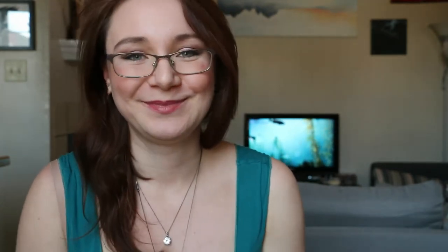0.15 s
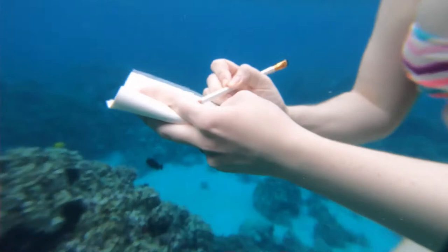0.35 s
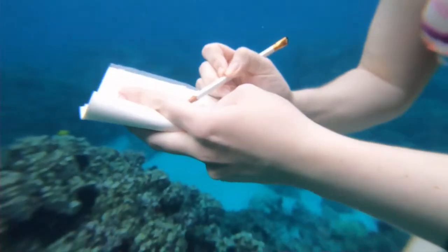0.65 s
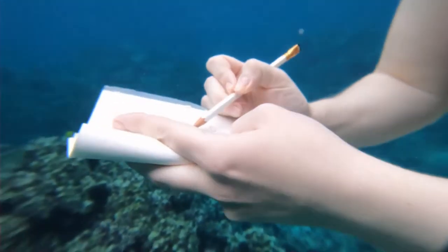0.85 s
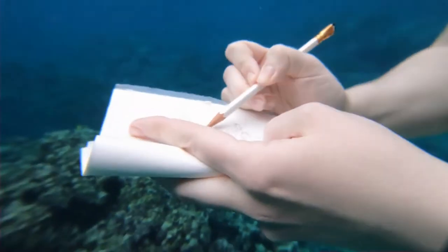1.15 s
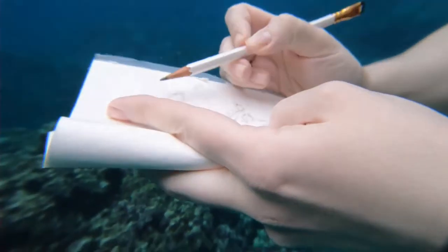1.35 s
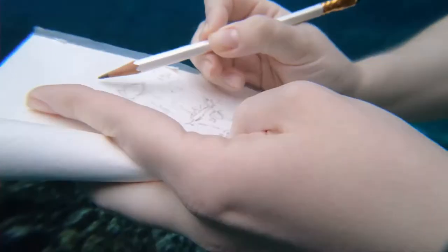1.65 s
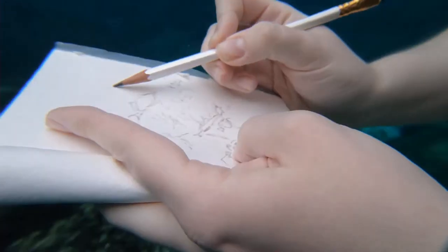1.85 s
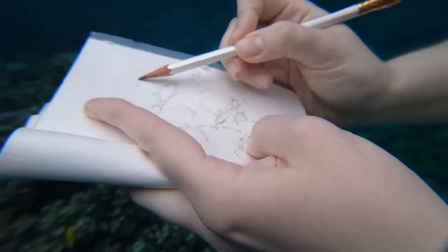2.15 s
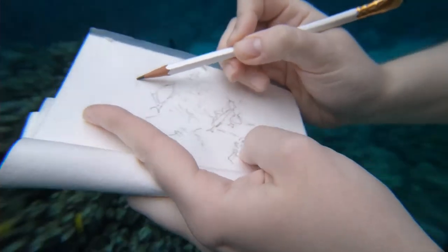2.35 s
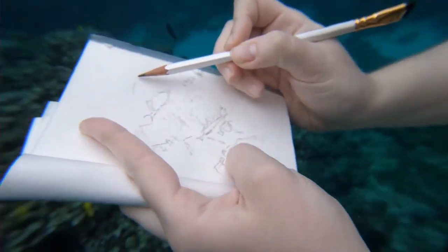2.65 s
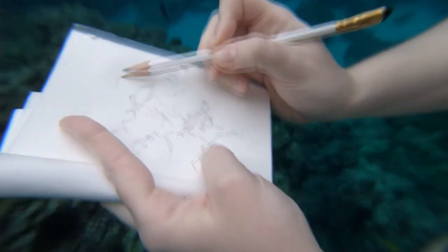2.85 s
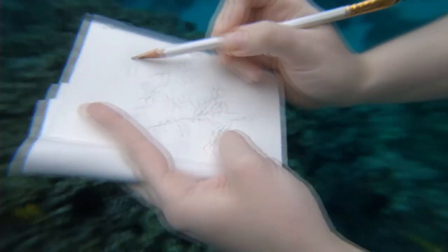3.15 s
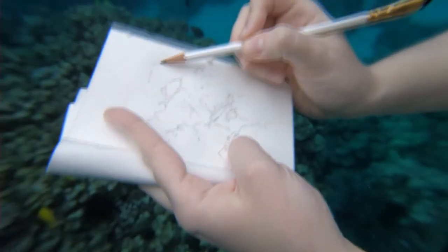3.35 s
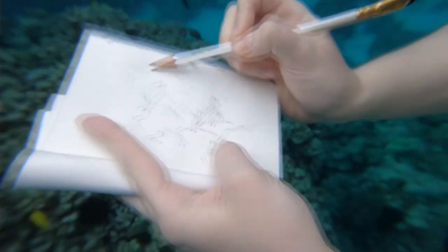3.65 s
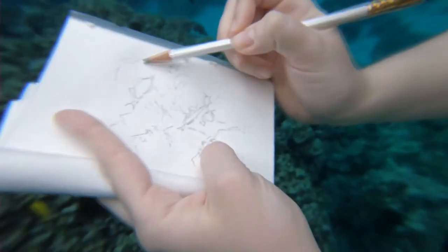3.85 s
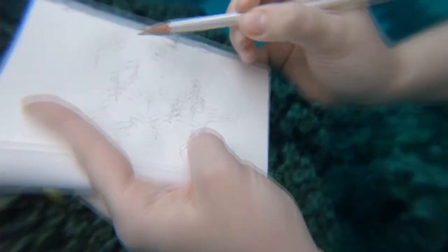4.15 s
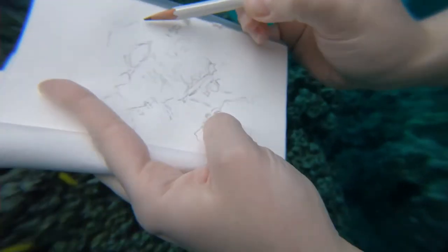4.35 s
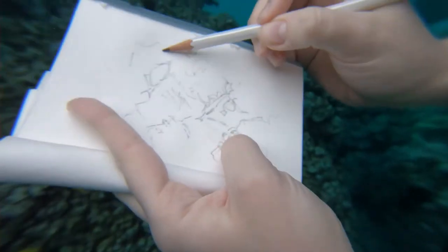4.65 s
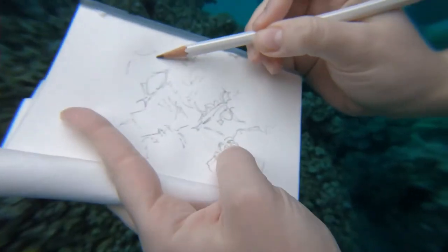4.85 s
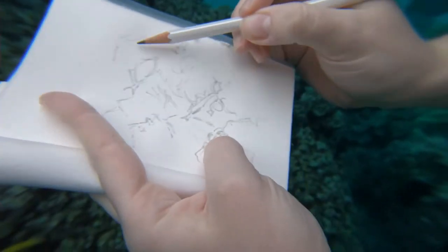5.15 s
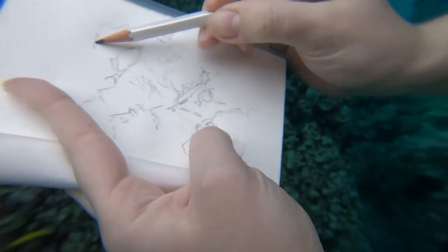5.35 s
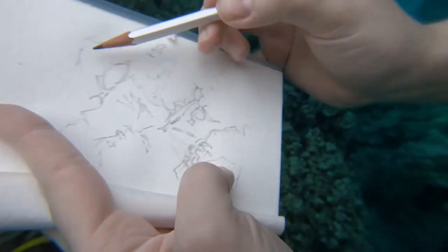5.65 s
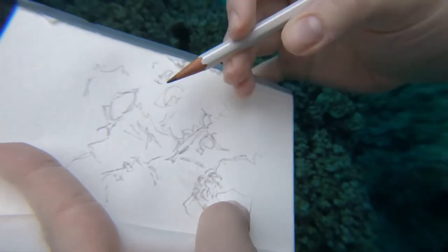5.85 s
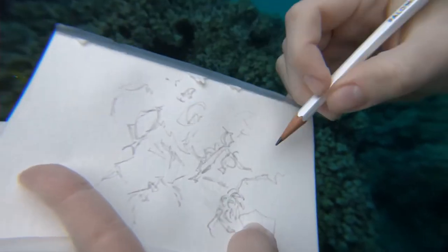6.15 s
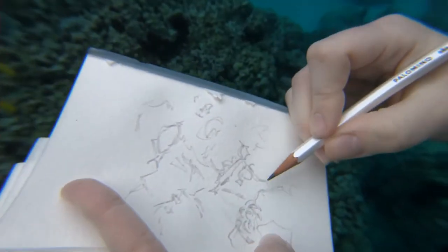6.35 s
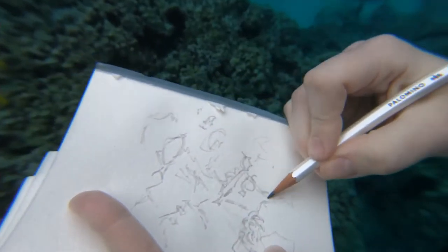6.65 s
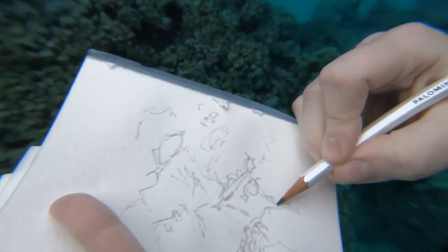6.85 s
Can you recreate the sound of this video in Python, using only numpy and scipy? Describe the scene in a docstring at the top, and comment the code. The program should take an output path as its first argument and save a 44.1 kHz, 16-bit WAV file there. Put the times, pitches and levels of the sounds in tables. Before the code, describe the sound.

A quiet living room is cut off, and close, boxy underwater sound takes over. Low surges and gurgles roll around the camera housing while fingers knock and drag on it, busiest in the first two and a half seconds. Crackling shrimp grow denser and wider around the listener. Short pencil scrapes and small bubbles follow, then a burst of deep shoves, a tiny gap and the first underwater bumps again.

```python
"""Living room, then coral reef: still room air and a faint hum stop short, and a camera housing is under water.
Shrimp snap near and far: shock fronts and noise bursts ringing wall resonances. Surges shape resonant
buffeting and gurgle, hissing wash and ringing froth. Hands bump (damped sines) and rub (grainy noise) the case,
a pencil scratches a pad, bubbles ring, and pressure swings shove the camera.
After the heavy shoves the underwater sound breaks off and its opening plays again."""
import sys
import numpy as np
from scipy import signal
from scipy.fft import rfft, irfft, next_fast_len
from scipy.io import wavfile

SR = 44100
rng = np.random.default_rng(int(sys.argv[2]) if len(sys.argv) > 2 else 0)


def store_pcm(level_fs):
    """Save levels as 16-bit WAV."""
    pcm = np.round(np.clip(level_fs, -1, 1) * 32767).astype(np.int16)
    wavfile.write(sys.argv[1], SR, np.atleast_2d(pcm).T)


N = 308853
TIME = np.arange(N) / SR
ROOM_END_S, DIVE_START_S, DIVE_END_S, RESTART_S = .210, .275, 6.484, 6.515
PORT_LAG_MS = .45   # lag range (+/-) between the two ports for randomly placed snaps


def from_db(db):
    """Decibels to gain."""
    return 10 ** (np.asarray(db) / 20)


def rms_one(x):
    """Scale to unit power."""
    return x / np.sqrt(np.mean(x ** 2) + 1e-20)


def pan(db):
    """Left and right gains for a left-minus-right level difference."""
    return from_db(np.array([[db], [-db]]) / 2)


def narrow(x, side_db):
    """Scale the difference between the ears."""
    mid = x.mean(axis=0)
    return mid + (x - mid) * from_db(side_db)


def add(out, s, sound):
    """Mix a stereo sound in at a time."""
    i = round(s * SR)
    out[:, i:i + sound.shape[1]] += sound[:, :N - i]


def in_time(curve):
    """A control curve at every sample."""
    return np.interp(TIME, *np.transpose(curve))


def drift(rate_hz):
    """Random control curve of rms 1: straight lines between random points."""
    points = rng.standard_normal(4096)
    return rms_one(np.interp(TIME * rate_hz, np.arange(len(points)), points))


def fade_between(start_s, end_s):
    """Gain of 1 between two times, with 2 ms fades."""
    edge_distance_s = np.minimum(TIME - start_s, end_s - TIME)
    return np.clip(edge_distance_s / .002, 0, 1)


def strokes(rows):
    """The strength of a row of short strokes over time."""
    return sum(from_db(db) * np.exp(-((TIME - s) / half_s) ** 2 / 2) for s, db, half_s in rows)


def pair(alike):
    """White noise at two ports with a given correlation."""
    mid, side = rng.standard_normal((2, N))
    alike = np.clip(alike, -1, 1)
    return np.sqrt(1 + alike) * mid + np.sqrt(1 - alike) * side * [[1], [-1]]


def colour(x, spectrum):
    """Shape a steady noise to a spectrum; rms 1."""
    size = next_fast_len(N)
    hz, db = np.transpose(spectrum)
    bins_hz = np.maximum(np.arange(size // 2 + 1) * SR / size, 1)
    gain = from_db(np.interp(np.log(bins_hz), np.log(hz), db))
    return rms_one(irfft(rfft(x, size) * gain, size)[:, :N])


def low_pass(x, hz, order=2):
    """Butterworth low-pass."""
    return signal.sosfilt(signal.butter(order, min(hz, .45 * SR), fs=SR, output="sos"), x)


def resonate(x, modes):
    """Parallel resonances with steep skirts."""
    out = 0
    for hz, width_hz, db in modes:
        edges_hz = [max(hz - width_hz * .7, 10), hz + width_hz * .7]
        band = signal.butter(2, edges_hz, "band", fs=SR, output="sos")
        out = out + from_db(db) * signal.sosfilt(band, x + 1e-18)
    return out


def arrive(x, lag_ms):
    """A sound reaches one port before the other; positive lag delays the left."""
    n, lag = np.arange(len(x)), round(lag_ms * SR / 1000)
    return np.array([np.interp(n - max(d, 0), n, x, left=0) for d in (lag, -lag)])


SNAP_CUT_HZ = 9580


def muffle(x, leak_db=-26):
    """The housing wall passes little of the top octave."""
    return low_pass(x, SNAP_CUT_HZ, order=8) + from_db(leak_db) * x


FLEX_HZ, FLEX_RADIANS = 250, 1.96


def flex(x):
    """Touches bend the wall: the right port lags the left in phase, except in the bass."""
    size = next_fast_len(x.shape[1] + 2048)
    steep = (np.arange(size // 2 + 1) * SR / size / FLEX_HZ) ** 8
    turn = np.exp(-1j * FLEX_RADIANS * steep / (1 + steep))
    right = irfft(rfft(x[1], size) * turn, size)[:x.shape[1]]
    return np.array([x[0], right])


# air spectrum: f/Hz, relative level/dB
ROOM_AIR = [(18, -70), (30, -5), (98, 0), (252, -10), (295, -7), (374, -7.5), (426, -14.5), (616, -15.5),
            (1250, -15), (2900, -26.5), (6550, -33), (9970, -34.5), (16000, -41)]
# appliance hum partials: f/Hz, level/dB
ROOM_HUM = [(291, -52.5), (438, -61)]


def living_room(air_db=-45, hiss_db=-67):
    """Still indoor air with a faint appliance hum, nearly the same in both ears, under a thin wide hiss."""
    hum = sum(from_db(db) * np.sqrt(2) * np.sin(2 * np.pi * hz * TIME) for hz, db in ROOM_HUM)
    air = colour(pair(.99), ROOM_AIR)
    return from_db(air_db) * air + hum + from_db(hiss_db) * rms_one(pair(0))


# far sizzle as the camera drifts over the reef: t/s, relative level/dB
COLONY = [(0.28, -74), (0.68, -67.5), (2.63, -61), (2.82, -65), (3.23, -59.5), (4.03, -61), (4.48, -59),
          (4.72, -64.5), (6.27, -58.5), (6.48, -58.5)]
# wall resonances under a snap, knock and crack: f/Hz, nominal width/Hz, relative level/dB
SNAP_LOW_MODES = [(1786, 246, -9), (2837, 457, 3), (4020, 590, -1.5)]
SNAP_HIGH_MODES = [(5110, 240, 0.77), (5730, 233, 3.3), (6460, 734, -1.4), (6967, 1045, -4)]


def far_shrimp(per_s=280, spread_db=6.5, low_db=-8, blur_db=-9, gain_db=6, waver_db=3.5):
    """The rest of the colony: countless weak snaps from all bearings, blurred into a sizzle."""
    clicks, rattle_t = np.zeros((2, N)), TIME[:40]
    chances = rng.random((4096, 3))
    rattles = rng.standard_normal((len(chances), len(rattle_t))) * (1 - rattle_t / rattle_t[-1])
    for (when, nearness, bearing), rattle in zip(chances[:int(per_s * N / SR)], rattles):
        size = from_db(spread_db * min(-np.log(nearness), 3))
        add(clicks, when * TIME[-1], size * arrive(rattle, lag_ms=PORT_LAG_MS * (2 * bearing - 1)))
    sizzle = rms_one(clicks) + from_db(blur_db) * pair(0)
    high = rms_one(resonate(sizzle, SNAP_HIGH_MODES))
    low = rms_one(resonate(sizzle, SNAP_LOW_MODES))
    level = from_db(in_time(COLONY) + gain_db + waver_db * drift(35))
    return level * muffle(high + from_db(low_db) * low)


# water surges: crest t/s, build-up/s, release/s, buffeting level/dB, gurgle level/dB, wash level/dB
SURGES = [(.35, 0.06, 0.14, -44, -48, -63.5), (.57, 0.034, 0.034, -37.5, -67, -63),
          (0.732, 0.095, 0.022, -74, -47, -51), (.97, 0.033, 0.17, -46, -59.5, -64.5),
          (1.42, 0.18, 0.2, -56.5, -56, -60.5), (1.76, 0.15, 0.091, -49, -61, -82),
          (1.96, 0.054, 0.11, -51.5, -58, -73), (2.2, 0.064, 0.084, -48, -56, -64),
          (2.62, .14, 0.097, -42, -49, -61.5), (3.15, 0.074, 0.15, -52.5, -55.5, -64.5),
          (3.48, 0.082, 0.021, -52, -57, -75), (3.99, 0.2, 0.17, -39.5, -46.5, -67),
          (4.42, 0.12, 0.11, -49.5, -60, -71), (4.65, 0.021, 0.037, -49.5, -56, -57.5),
          (5.36, 0.33, 0.066, -46, -57, -67), (6.02, 0.22, 0.21, -42, -54.5, -67),
          (6.39, 0.072, 0.21, -37, -46, -57.5)]
# between surges: buffeting level/dB, gurgle level/dB, wash level/dB
CALM_DB = (-61.5, -69.5, -69)


def surges():
    """Strength of buffeting, gurgle and wash over time: each surge builds to a crest and lets go."""
    power = from_db(CALM_DB)[:, None] ** 2 + np.zeros(N)
    for s, build_s, release_s, *levels_db in SURGES:
        width_s = np.where(TIME < s, build_s, release_s)
        swell = np.exp(-np.minimum(((TIME - s) / width_s) ** 2, 20))
        power += from_db(levels_db)[:, None] ** 2 * swell
    return np.sqrt(power)


# housing and cavity resonances: f/Hz, nominal width/Hz, relative level/dB
BUFFET_MODES = [(58.6, 13.8, 10), (149, 57.5, -6), (165.8, 49.3, 4.5), (200, 11.7, -2), (384, 165, -28.5)]
GURGLE_MODES = [(462, 69, 2), (666.4, 89, 7), (792.5, 18.3, 5)]
# cavity tuning: t/s, pitch ratio
GURGLE_PITCH = [(.3, 0.86), (.55, 0.89), (.72, 1.005), (4.9, 1.02), (6.4, 0.98)]
# slow rocking spectrum: f/Hz, relative level/dB
SWAY = [(10, -17), (28, 2), (45, -12), (90, -71), (300, -49.5)]
SWAY_DB, SWAY_FOLLOWS = -64.5, 0.25   # base level; exponent on the buffeting


def flow(buffeting, gurgling):
    """Eddies shake the housing's low modes, rock the camera and gurgle in cavities."""
    eddies, rocking = drift(14), drift(6)
    buffet = rms_one(resonate(pair(0.59), BUFFET_MODES)) * buffeting * from_db(1.23 * eddies)
    sway_level = rms_one(buffeting) ** SWAY_FOLLOWS * from_db(SWAY_DB + 4.3 * rocking)
    sway = colour(pair(0.6), SWAY) * sway_level
    read = np.cumsum(in_time(GURGLE_PITCH)) % N   # varying read speed shifts the pitch
    cavity = [np.interp(read, np.arange(N), port) for port in resonate(pair(0.12), GURGLE_MODES)]
    gurgle = rms_one(np.array(cavity)) * gurgling * from_db(3.04 * drift(40))
    return (buffet + sway + gurgle) * pan(db=-1.5)


def froth(per_s=450, spread_db=6, cycles=5):
    """Tiny bubbles burst along the case at random, each ringing for a few cycles."""
    out, t = 0, TIME[:512]
    for hz in np.geomspace(1000, 3200, num=12):
        born = (rng.random(N) < per_s / 12 / SR) * rng.choice([-1, 1], N)
        size = from_db(spread_db * np.minimum(rng.exponential(1, N), 3))
        ring = np.sin(2 * np.pi * hz * t) * np.exp(-3 * hz * t / cycles)
        out = out + arrive(signal.oaconvolve(born * size, ring)[:N], lag_ms=0.38)
    return rms_one(out)


# wash spectrum: f/Hz, relative level/dB
WASH = [(250, 10.5), (700, 4), (1150, 1), (1700, 6), (2100, -8.5), (2800, 6.5), (4300, -0.5), (7000, -14),
        (10000, -13), (13000, -35), (16000, -58)]


def wash(strength, hiss_db=2.0, froth_db=1.3):
    """Water hisses and froths over the camera's face."""
    flutter = from_db(1.5 * drift(90))
    hiss = colour(pair(0), WASH) * flutter
    return strength * (from_db(hiss_db) * hiss + from_db(froth_db) * froth())


# single bubbles: t/s, relative level/dB, starting f/Hz, t60/s
BUBBLES = [(3.69, -26.5, 1365, 0.024), (4.414, -49, 753, 0.086), (5.438, -34.5, 1353, 0.016),
           (6.226, -30, 823, 0.015)]
BUBBLE_WOBBLE = .3


def bubbles(phase_rise_per_s=1.8, pinch_s=0.0058):
    """A bubble pinches off and rings, rising a little in pitch as its shape wobbles."""
    out, t = np.zeros((2, N)), TIME[:4096]
    for s, db, hz, t60_s in BUBBLES:
        ring = np.sin(2 * np.pi * hz * t * (1 + phase_rise_per_s * t)) * (1 - np.exp(-t / pinch_s))
        wobble = rms_one(low_pass(rng.standard_normal(len(t)), hz=180))
        ring = ring * (1 + BUBBLE_WOBBLE * wobble)
        add(out, s, arrive(ring * from_db(db + 10 - 60 * t / t60_s), lag_ms=0.26))
    return out


# pencil strokes on the pad: middle t/s, level/dB, half length/s
SCRATCHES = [(2.180, -59.5, 0.028), (3.691, -48, 0.0062), (4.428, -49.5, 0.0085), (4.650, -50, 0.0072),
             (5.995, -55.5, 0.0077), (6.050, -48, 0.027), (6.110, -47, 0.013), (6.165, -45.5, 0.0084)]
# pad resonances: f/Hz, nominal width/Hz, relative level/dB
PENCIL_MODES = [(1395, 110, 3), (1920, 500, -1.5), (2470, 580, 5)]


def pencil(grain_db=6):
    """The lead catches on the tooth of the paper and rattles the pad."""
    grains = pair(0.49) * from_db(grain_db * drift(300))
    return strokes(SCRATCHES) * rms_one(resonate(grains, PENCIL_MODES))


# skin dragging on the case: middle t/s, level/dB, half length/s
RUBS = [(.585, -48.5, 0.035), (0.922, -40, 0.012), (1.341, -32, 0.0025), (1.369, -49, .003),
        (1.400, -53, 0.074), (1.709, -42, 0.022), (1.748, -31.5, 0.0067), (1.780, -31, 0.0096),
        (1.818, -42, 0.021), (2.367, -32, 0.0048), (2.41, -49, 0.035), (4.420, -50, 0.0063),
        (6.248, -41.5, 0.0065)]
# rub spectrum: f/Hz, relative level/dB
RUB = [(25, -22), (70, 8), (180, 1.5), (450, 3.5), (700, -9), (1100, -4), (1700, -11), (3200, -15.5),
       (4500, -26.5), (12000, -49)]


def rubs(grain_db=4):
    """Skin sticks and slips in uneven grains under each short stroke."""
    grains = pair(0.53) * from_db(grain_db * drift(400))
    return strokes(RUBS) * flex(colour(grains, RUB)) * pan(db=-3.5)


# bumps on the housing: t/s, thud level/dB, f/Hz, swell/s, hard contact level/dB
BUMPS = [(0.345, -31, 152, 0.0012, -54), (0.55, -27.5, 87, .0054, -42), (0.577, -24, 67, 0.0093, -39),
         (.917, -33, 250.7, 0.0024, -18), (.924, -22.5, 150, 0.0039, -50), (.937, -27, 182, .0038, -43),
         (1.003, -21, 130, 0.0025, -30.5), (1.22, -27.5, 177, 0.0041, -34.5),
         (1.238, -35.5, 167, 0.0035, -46), (1.34, -23, 170, 0.007, -44), (1.4, -39, 158, 0.0086, -56),
         (1.735, -33, 160, 0.019, -59), (1.768, -36.5, 167, 0.014, -56), (1.845, -38.5, 186, 0.0069, -43),
         (2.369, -28.5, 157, 0.0093, -37), (2.392, -29, 158, 0.009, -43), (2.487, -35, 143, 0.0054, -39),
         (2.554, -18.5, 87.5, 0.0023, -39.5), (2.57, -34.5, 193.6, 0.0048, -53),
         (3.138, -44.5, 188, 0.0099, -37), (3.471, -40.5, 151.9, 0.0047, -53),
         (3.958, -31, 125.2, 0.012, -42), (4.013, -32, 122, 0.023, -51), (4.112, -27, 183, 0.0035, -81),
         (4.392, -37.5, 158, 0.0025, -51), (4.755, -42, 125, 0.0065, -53), (5.257, -36, 127, 0.012, -49),
         (5.992, -32.5, 131, 0.013, -46)]
# hard contact resonances: f/Hz, nominal width/Hz, relative level/dB
CONTACT_MODES = [(386, 135, -5.5), (550, 196, -1.5), (1110, 370, -22.5)]
# deep thuds move the whole case; higher ones lean to the right
WHOLE_CASE_HZ, BUMP_PAN_DB_PER_OCTAVE = 112, -16.5


def bumps(contact_s=0.0047, contact_gain_db=2, thud_lag_ms=0.1, sag=0.048, body_db=-11, body_s=0.022):
    """A hard tick of contact, a thud that the water damps within a few cycles, and a shudder of the case."""
    out, t = np.zeros((2, N)), TIME[:8192]
    for s, db, hz, swell_s, contact_db in BUMPS:
        age = t / max(swell_s, .001)
        pitch_hz = hz * (1 + sag * (np.exp(-age / 2) - .5))   # the wall slackens as the push lets go
        push = age * np.exp(1 - age)
        thud = arrive(push * np.sin(2 * np.pi * np.cumsum(pitch_hz) / SR), thud_lag_ms)
        tick = resonate(rng.standard_normal(len(t)) * np.exp(-t / contact_s), CONTACT_MODES)
        tick = flex(from_db(contact_gain_db) * tick / np.abs(tick).max() * pan(db=-5.5))
        body = resonate(rng.standard_normal(len(t)) * np.exp(-t / body_s), BUFFET_MODES)
        body = from_db(body_db) * body / np.abs(body).max()
        pan_db = BUMP_PAN_DB_PER_OCTAVE * np.clip(np.log2(hz / WHOLE_CASE_HZ), 0, .7)
        add(out, s, from_db(db) * (thud + body) * pan(pan_db) + from_db(contact_db) * tick)
    return out


# shoves through the water: turn t/s, level/dB, width/s, left minus right/dB
SHOVES = [(6.3835, -17, 0.0066, 2), (6.4092, -14.5, 0.003, -3), (6.4367, -17, 0.0097, -5),
          (6.466, -13.5, 0.0033, -8.5)]


def shoves():
    """Pressure builds ahead of the moving case and swings to suction as it stops."""
    out = 0
    for s, db, width_s, pan_db in SHOVES:
        u = (TIME - s) / width_s
        out = out - from_db(db) * u * np.exp((1 - u ** 2) / 2) * pan(pan_db)
    return out


NEIGHBOURS_PER_S, NEIGHBOUR_DB, NEIGHBOUR_SPREAD_DB, NEIGHBOUR_KNOCK_DB = 12, -48.5, 4, -7.5


def neighbours():
    """Snaps from a little farther off, at random moments and bearings, louder where the colony is near."""
    colony_db = in_time(COLONY) - in_time(COLONY).mean()
    rows = []
    for when, loud, thin, bearing in rng.random((256, 4))[:int(NEIGHBOURS_PER_S * N / SR)]:
        i = int(when * (N - 1))
        crack_db = NEIGHBOUR_DB + colony_db[i] + NEIGHBOUR_SPREAD_DB * (2 * loud - 1)
        knock_db = crack_db + 2 * thin * NEIGHBOUR_KNOCK_DB
        rows.append((max(TIME[i], DIVE_START_S), knock_db, crack_db, PORT_LAG_MS * (2 * bearing - 1)))
    return rows


# nearest shrimp: t/s, knock level/dB, crack level/dB, left ear lag/ms
SNAPS = [(0.3734, -40.5, -47.5, 0.0), (0.6184, -46.5, -51.5, 0.0), (0.9271, -37.5, -41.5, 0.012),
         (1.6216, -49, -37, 0.077), (1.9533, -32.5, -30.5, 0.0053), (2.3024, -48, -38, -0.52),
         (2.4356, -39, -46, 0.0), (2.4431, -27, -38, -0.38), (2.5285, -37.5, -49, 0.5),
         (2.5541, -40, -40, -0.39), (2.5756, -31.5, -35, -0.34), (2.594, -40, -42, -0.55),
         (2.7767, -50, -41, -0.39), (2.984, -45.5, -33.5, 0.07), (3.1151, -26.5, -33.5, -0.37),
         (3.1478, -48, -37.5, 0.05), (3.221, -48, -41, 0.2), (3.4062, -47, -39.5, 0.43),
         (3.526, -58, -38.5, -0.41), (3.7604, -40, -45, -0.32), (3.9037, -39, -29.5, -0.38),
         (3.9184, -37, -48, 0.41), (4.1977, -37.5, -41, -0.46), (4.3394, -36, -34.5, -0.0066),
         (4.3666, -27, -28, 0.07), (4.5239, -45.5, -41, -0.38), (4.5873, -36, -30.5, 0.076),
         (4.6437, -49, -37.5, 0.44), (5.1519, -29, -35, -0.19), (5.2429, -43.5, -37, -0.0082),
         (5.3883, -26, -42, 0.075), (5.4661, -47, -36.5, 0.5), (5.536, -49.5, -37.5, 0.34),
         (5.6569, -48, -40.5, 0.079), (5.9093, -38.5, -35, 0.26), (6.1991, -36.5, -31.5, 0.43),
         (6.2603, -40.5, -32, -0.09)]
SNAP_TILT = 0.42   # dB per octave for each dB that the knock outweighs the crack


def near_shrimp(snaps, front_db=14, rattle_s=.001, own_db=-9, tail_db=-21, tail_t60_s=0.084, leak_db=-20):
    """A shock front, a millisecond of rattle across the housing, then a short tail scattered by the reef."""
    out, fronts, t = np.zeros((2, N)), np.zeros((2, N)), TIME[:2048]
    front, rattle = 1.0 * (t == 0), np.exp(-(t / rattle_s) ** 2)
    own_level = from_db(own_db) * rattle + from_db(tail_db - 60 * t / tail_t60_s)
    for s, knock_db, crack_db, lag_ms in snaps:
        noise = rng.standard_normal((3, len(t)))
        crack = arrive(from_db(front_db) * front + noise[0] * rattle, lag_ms)
        snap = crack + noise[1:] * own_level   # each port's own share
        # a heavy knock favours the lower wall resonances
        tilt = SNAP_TILT * (knock_db - crack_db)
        for modes, level_db in (SNAP_LOW_MODES, knock_db), (SNAP_HIGH_MODES, crack_db):
            # each snap finds slightly different resonances
            tuned = [(hz * rng.uniform(.96, 1.04), width_hz, db - tilt * np.log2(hz / modes[0][0]))
                     for hz, width_hz, db in modes]
            ring = resonate(snap, tuned)
            power = np.mean(ring[:, :220] ** 2)   # first 5 ms
            add(out, s - .0002, from_db(level_db) * ring / np.sqrt(power))
        # a trace passes the wall undulled
        add(fronts, s, arrive(3 * front, lag_ms) * from_db(crack_db + leak_db))
    return muffle(out) + fronts


# the reef's stereo image starts narrow and opens: t/s, side level/dB
OPENING = [(.3, -28.5), (.52, -9.5), (.68, -8.5), (.9, -1)]


def scene():
    """The room, the reef, and the start of the reef once more."""
    buffeting, gurgling, washing = surges()
    room = living_room() * fade_between(0, ROOM_END_S)
    water = flow(buffeting, gurgling) + wash(washing) + bubbles()
    handling = pencil() + rubs() + bumps() + shoves()
    shrimp = far_shrimp() + near_shrimp(list(SNAPS) + neighbours())
    reef = narrow(water + handling + shrimp, in_time(OPENING))
    reef = reef * fade_between(DIVE_START_S, DIVE_END_S)
    out = room + reef
    add(out, RESTART_S, reef[:, round(DIVE_START_S * SR):])
    return out


CUTOFF_HZ = 15800


def record(dry):
    """Faint self-noise, and a steep low-pass cuts the top."""
    hiss = from_db(-97) * pair(0)
    return signal.sosfilt(signal.ellip(10, .1, 90, CUTOFF_HZ, fs=SR, output="sos"), dry + hiss)


dry = scene()
out = record(dry)
store_pcm(out)
```